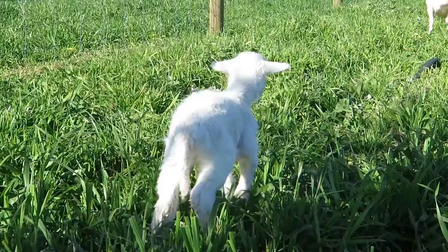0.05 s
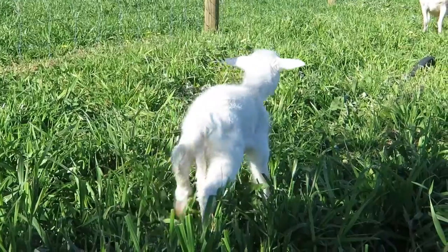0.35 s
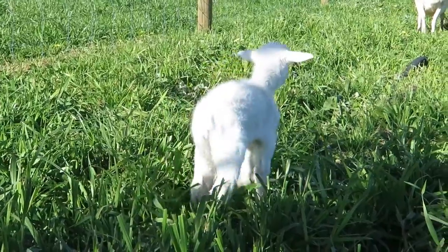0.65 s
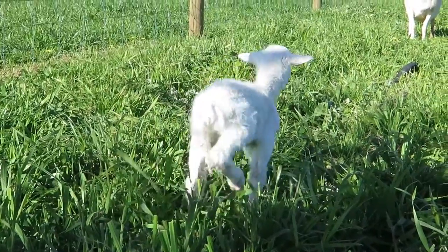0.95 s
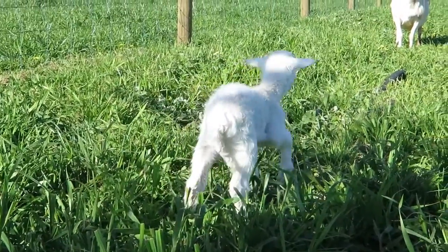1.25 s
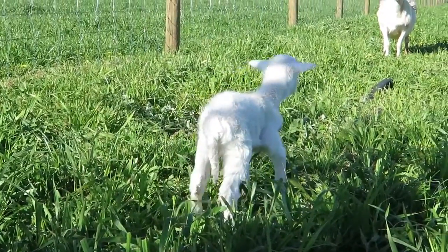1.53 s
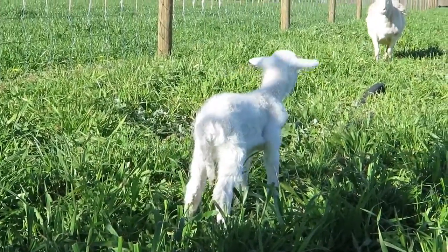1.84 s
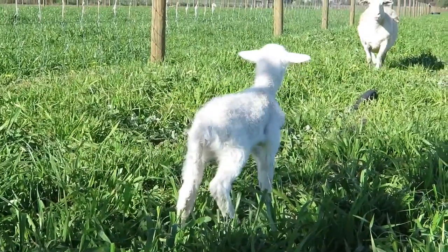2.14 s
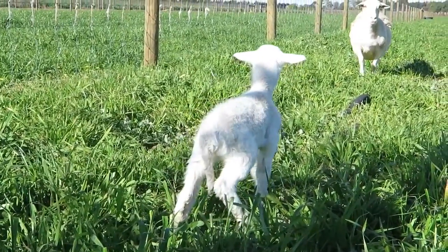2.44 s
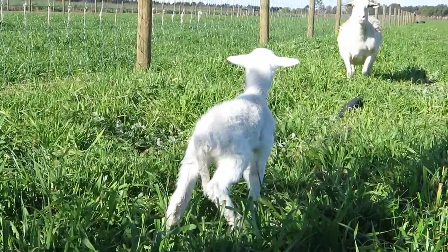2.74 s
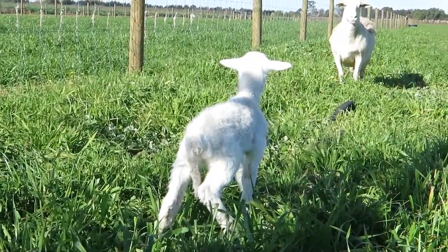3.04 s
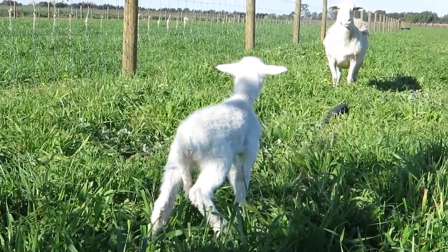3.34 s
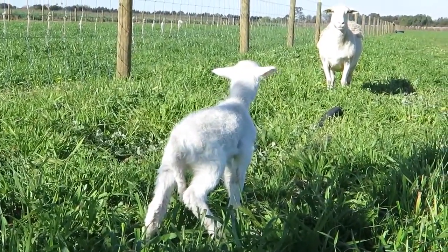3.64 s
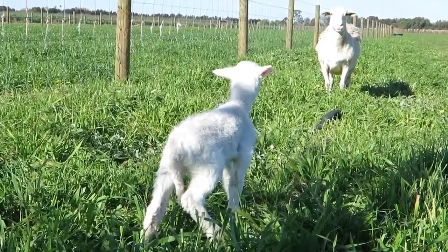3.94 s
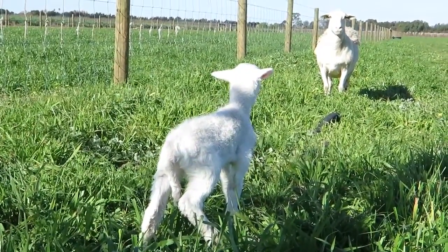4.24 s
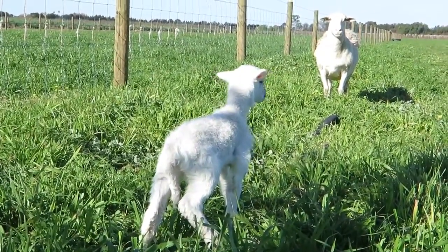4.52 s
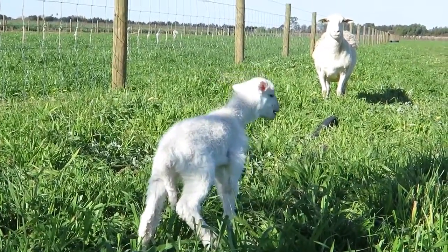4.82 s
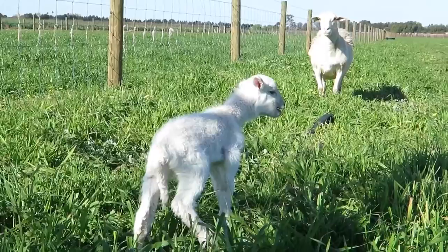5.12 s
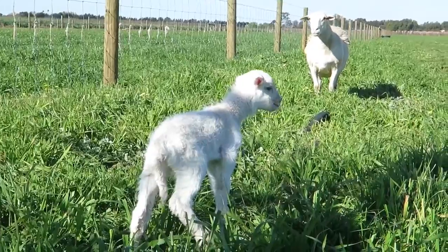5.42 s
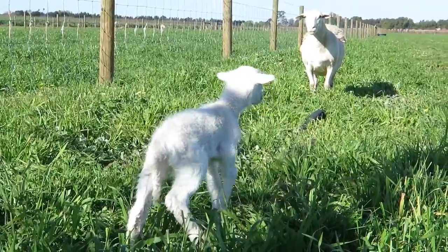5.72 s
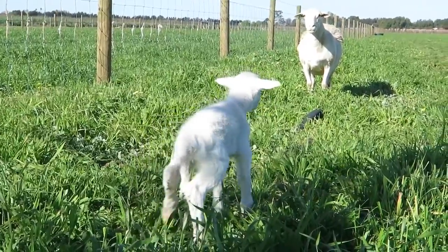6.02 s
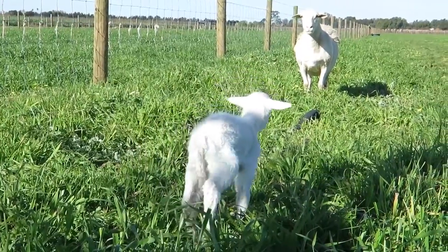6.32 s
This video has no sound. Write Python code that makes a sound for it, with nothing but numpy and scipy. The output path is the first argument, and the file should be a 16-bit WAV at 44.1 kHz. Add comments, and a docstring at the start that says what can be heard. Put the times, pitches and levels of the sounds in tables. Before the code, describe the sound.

Light wind buffets the microphone in an open paddock with no echo, and an engine hums faintly far away. A nearby lamb gives five high, steady bleats, the third and fourth loudest. One faint, low ewe call overlaps the second. Two bursts of quick, hard clicking from a loose part on the camera come after the second and fourth bleats. Grass swishes and snaps quietly now and then, and one hoof lands softly.

```python
"""Light wind rumbles over a distant engine hum, and a young lamb bleats five times a few steps away.
Each bleat is a stack of harmonics from the vocal folds, shaped by the throat and the opening mouth.
A ewe answers once from far off. In the gusts something loose on a hand-held camera rattles.
Now and then the paddock grass swishes or a stem snaps, and one hoof lands on soft turf."""
import sys
import numpy as np
from scipy import signal
from scipy.fft import rfft, irfft, next_fast_len
from scipy.io import wavfile

SR = 44100
rng = np.random.default_rng(int(sys.argv[2]) if len(sys.argv) > 2 else 0)


def store_wav(level_fs):
    """Save 16-bit WAV to argv[1]."""
    pcm = np.round(np.clip(np.atleast_2d(level_fs), -1, 1) * 32767)
    wavfile.write(sys.argv[1], SR, pcm.T.astype(np.int16))


N = 285327
TIME = np.arange(N) / SR


def amp(db):
    """Decibels to gain."""
    return 10 ** (np.asarray(db) / 20)


def unit(x):
    """Scales to rms 1."""
    return x / np.sqrt(np.mean(x ** 2) + 1e-20)


def gain_at(spectrum, hz):
    """Gain of a spectrum, interpolated in dB over log frequency."""
    freq_hz, db = np.transpose(spectrum)
    return amp(np.interp(np.log(hz + 1), np.log(freq_hz + 1), db))


def curves(rows, t):
    """Every column after the first, interpolated at times t."""
    time_s, *columns = np.transpose(rows)
    return [np.interp(t, time_s, column) for column in columns]


def add(mix, start_s, sound):
    """Mixes a sound in at start_s."""
    part = mix[..., max(round(start_s * SR), 0):][..., :sound.shape[-1]]
    part += sound[..., :part.shape[-1]]


def wander(size, rate_hz):
    """Smooth random motion, rms about 1."""
    length = 2 ** 15 if size <= 2 ** 15 else 2 ** 19
    rolloff = 1 + (np.fft.rfftfreq(length, 1 / SR) / rate_hz) ** 4
    return unit(irfft(rfft(rng.standard_normal(length)) / rolloff))[:size]


def noise(spectrum, size, correlation):
    """Coloured stereo noise, rms 1."""
    length = next_fast_len(2 * (size // 2 + 1), True)
    gains = gain_at(spectrum, np.fft.rfftfreq(length, 1 / SR))
    mid, side = irfft(rfft(rng.standard_normal((2, length))) * gains, length)[:, :size]
    return unit(mid * np.sqrt(1 + correlation) + np.array([side, -side]) * np.sqrt(1 - correlation))


# wind strength: time_s, level_db
BREEZE = [(.1, -34.5), (1.1, -37), (2.1, -36.5), (3.6, -39), (5.1, -38), (6.47, -35)]
GUSTS = [(.1, -37), (.5, -37), (1.1, -37.5), (2.1, -36), (2.7, -42), (3.6, -37.5), (5.1, -43), (5.5, -36.5),
         (6.1, -32.5), (6.47, -40)]
# wind spectra: freq_hz, gain_db
RUMBLE_SPECTRUM = [(15, -32), (25, -13), (35, -9), (55, 0.5), (65, 7), (72, 14.5), (82, 2), (110, 2.5),
                   (140, -1.5), (220, -24.5), (600, -70)]
BUFFET_SPECTRUM = [(25, -40), (70, -2.5), (130, -4), (180, 4), (240, 1.5), (320, -6), (450, -11.5),
                   (650, -31), (1100, -25), (1600, -21), (4000, -28.5), (12000, -71)]
WASH_SPECTRUM = [(40, -32), (300, 8), (450, -2), (640, 1), (1100, 4), (1600, -6.5), (2700, -8), (5000, -9),
                 (9000, -13.5), (12500, -15.5), (15800, -25)]

def wind(lump_db=0.9, wash_db=-44.5, shimmer_db=0.9, wash_follow=0.59):
    """Deep rumble and the wash of the field swell with the breeze; gusts buffet the microphone."""
    breeze_db, gust_db = curves(BREEZE, TIME)[0], curves(GUSTS, TIME)[0]
    rumble = amp(breeze_db) * noise(RUMBLE_SPECTRUM, N, correlation=1.0)
    buffet = amp(gust_db + lump_db * wander(N, 25)) * noise(BUFFET_SPECTRUM, N, correlation=0.72)
    swell_db = wash_follow * (breeze_db - breeze_db.mean()) + shimmer_db * wander(N, 9.9)
    wash = amp(wash_db + swell_db) * noise(WASH_SPECTRUM, N, correlation=0.23)
    return rumble + buffet * amp([[.7], [-.7]]) + wash


# engine partials: freq_hz, level_db
HUM_PARTIALS = [(75.4, -40.5), (150.7, -46.5)]
# swell on both partials: time_s, gain_db
HUM_SWELL = [(0, -17), (2.3, -0.5), (3.2, 0.5), (5, 2), (6.47, 4.5)]

def engine(waver=0.0057):
    """A far engine drones on two partials that waver together."""
    clock_s = np.cumsum(1 + waver * wander(N, 3.0)) / SR
    drone = sum(amp(db) * np.sqrt(2) * np.sin(2 * np.pi * hz * clock_s) for hz, db in HUM_PARTIALS)
    return drone * amp(curves(HUM_SWELL, TIME)[0])


# blade swishes: start_s, length_s, level_db
SWISHES = [(0.07, 0.16, -46.5), (0.772, 0.17, -44), (1.65, 0.11, -49.5), (1.995, .12, -54),
           (2.268, 0.17, -51.5), (2.414, 0.041, -47), (6.132, 0.038, -48)]
# stem snaps: start_s, level_db
TICKS = [(2.7045, -31), (5.421, -42), (5.656, -33)]
# their spectra: freq_hz, gain_db
SWISH_SPECTRUM = [(1500, -29), (3000, -16), (5000, 3), (8000, 2), (11000, 7), (13500, -1), (16000, -17)]
TICK_SPECTRUM = [(3000, -10), (7000, -8), (10000, -1), (13000, -4), (16000, -8)]

def grass(grain_db=3.0, tick_t60_s=0.02):
    """Blades swish with a grainy hiss; snapping stems give dry ticks."""
    out = np.zeros((2, N))
    for start_s, length_s, db in SWISHES:
        size = int(length_s * SR)
        blades = unit(noise(SWISH_SPECTRUM, size, correlation=0.82) * amp(grain_db * wander(size, 250)))
        add(out, start_s, amp(db) * blades * np.sqrt(np.hanning(size)))
    t = np.arange(2048) / SR
    for start_s, db in TICKS:
        add(out, start_s, noise(TICK_SPECTRUM, len(t), correlation=.4) * amp(db - 60 * t / tick_t60_s))
    return out


RELEASE_S = 0.037
# voice bands (nasal, mouth, upper, edge): shut_drop_db, lag_s, tiring_factor
BANDS = [(-1, 0.0043, 0.079), (23, 0.017, 0.76), (24, 0.0024, 1.11), (17.5, 0.0015, 1.23)]

def effort(call, t, attack_s=0.032, attack_db=28.5, release_db=18):
    """Level of each band in dB: the voice swells, the mouth opens, the lamb tires and lets go."""
    start_s, shut_s, held_s, opening_s, *full_db, tiring_db = call
    open_s, let_go_s = start_s + shut_s, start_s + held_s
    onset_db = attack_db * np.clip(1 - (t - start_s) / attack_s, 0, 1)
    break_off_db = release_db * (np.maximum(t - let_go_s, 0) / RELEASE_S) ** 3
    sag_db = tiring_db * np.clip((t - open_s) / (let_go_s - open_s), 0, 1) ** 2
    levels_db = []
    for db, (shut_drop_db, lag_s, tiring_factor) in zip(full_db, BANDS):
        shut = .5 * (1 - np.tanh(.5 * (t - open_s - lag_s) / opening_s))
        levels_db.append(db - onset_db - break_off_db - tiring_factor * sag_db - shut_drop_db * shut)
    return levels_db


# highest throat resonances, common to all bleats: freq_hz, gain_db
EDGE = [(7100, -24), (8000, -27), (9200, -25), (10400, -18), (11500, -29), (12800, -32), (14000, -42.5),
        (15500, -51)]

def rasp(throat, phase, level_db, slack, rasp_db=-21, catch_db=9, pulsing=0.63):
    """Turbulence at the folds, one puff a cycle, stronger where the voice catches."""
    spectrum = [(1000, -45), (2700, -62)] + list(throat)[6:] + [(hz, db + 9.5) for hz, db in EDGE]
    puffs = noise(spectrum, len(phase), correlation=0.94) * (1 + pulsing * np.cos(phase))
    return puffs * amp(level_db + rasp_db + catch_db * slack)


# borders between the voice bands: freq_hz
BAND_BORDERS_HZ = [1150, 2620, 7200]

def bleat(call, held_pitch, throat, scoop=.12, scoop_s=.085, release_drop=.13,
          jitter=0.00345, slack_jitter=0.018, flutter_db=2.5, drift_db=4.0):
    """Harmonics through the throat; slack folds vibrate low and unevenly as they start and stop."""
    start_s, _, held_s, *_ = call
    let_go_s = start_s + held_s
    t = np.arange(start_s, let_go_s + 2 * RELEASE_S, 1 / SR)
    size = len(t)
    flat = scoop * np.maximum(1 - (t - start_s) / scoop_s, 0) ** 2
    flat += release_drop * (np.maximum(t - let_go_s, 0) / RELEASE_S) ** 1.27
    slack = np.clip(flat / 0.059, 0, 1)
    pitch_hz = curves(held_pitch, t)[0] * (1 - flat)
    orders = np.arange(1, 33)
    harmonics_hz = orders * np.median(pitch_hz)
    pitch_hz *= 1 + jitter * wander(size, 44) + slack_jitter * slack * wander(size, 143)
    phase = 2 * np.pi * np.cumsum(pitch_hz) / SR
    gains = gain_at(list(throat) + EDGE, harmonics_hz)
    bands = np.searchsorted(BAND_BORDERS_HZ, harmonics_hz)
    levels_db = effort(call, t)
    out = rasp(throat, phase, levels_db[2], slack)
    for k, hz, gain, band in zip(orders, harmonics_hz, gains, bands):
        level = amp(levels_db[band]) * gain / np.linalg.norm(gains[bands == band])
        # paths over the grass shift as the head moves: short waves vary most and differ between ears
        height = min(hz / 10000, 1)
        level *= amp(flutter_db * np.sqrt(height) * wander(size, 30.6))
        level *= amp(drift_db * height * wander(size, 4.9))
        ear_rad = 0.44 * height * (1 + 0.89 * wander(size, 4.5))
        # uneven cycles blur each harmonic, most when high or slack
        blur = amp(-24 + 6 * np.log2(hz / 4000) + 12 * slack)
        sidebands = blur * (wander(size, 78) + 1j * wander(size, 74))
        level *= np.sqrt(2 / (1 + 2 * blur ** 2))
        tone = level * (1 + sidebands) * np.exp(1j * (k * phase + rng.uniform(0, 2 * np.pi)))
        pan_db = 0.8 if hz < 3500 else -0.8
        out[0] += amp(pan_db / 2) * (tone * np.exp(1j * ear_rad)).real
        out[1] += amp(-pan_db / 2) * (tone * np.exp(-1j * ear_rad)).real
    return out * signal.windows.tukey(size, .02)


# calls: start_s, shut_s, held_s, opening_s, nasal_db, mouth_db, upper_db, edge_db, tiring_db
BLEATS = [(0.129, 0.081, 0.61, 0.014, -36, -23.5, -25.5, -33, 8.5),
          (1.198, 0.065, .43, 0.0091, -38, -27, -29, -35.5, 2.5),
          (3.126, 0.067, 0.57, 0.024, -35, -18.5, -21.5, -33.5, 5.5),
          (4.72, .057, 0.5817, 0.014, -40, -19.5, -20, -32.5, 1.7),
          (6.189, 0.077, 0.33, 0.005, -38, -33, -29, -40.5, 5.5)]
# held pitch, one list per bleat: time_s, pitch_hz
HELD_PITCH = [
    [(.238, 470.5), (.3, 478.6), (.422, 469.3), (.53, 473.4), (.65, 474), (.735, 474)],
    [(1.281, 462.7), (1.33, 476), (1.42, 463.8), (1.5, 469), (1.57, 476.6), (1.63, 471.3)],
    [(3.2, 481), (3.245, 484.4), (3.33, 483), (3.449, 482.3), (3.57, 492), (3.7, 482.7)],
    [(4.8, 476), (4.95, 482.5), (5.03, 489.4), (5.131, 501.2), (5.172, 491), (5.22, 498), (5.3, 491)],
    [(6.286, 464), (6.34, 468.3), (6.41, 456.4), (6.47, 461)],
]
# throat response in each bleat: freq_hz, gain_db
THROAT_1 = [(470, -9), (950, -12.5), (1420, 5), (1890, -18.5), (2370, -11.5), (2840, -29.5), (3310, -14),
            (3790, -9), (4260, -13.5), (4730, -9.5), (5210, -14), (5680, -10), (6150, -15.5), (6630, -27)]
THROAT_2 = [(470, -11.5), (940, -15.5), (1410, 4.5), (1880, -14.5), (2350, -11.5), (2820, -18),
            (3300, -11.5), (3770, -4.5), (4240, -9.5), (4710, -4), (5180, -9), (5650, -2), (6120, -4.5),
            (6590, -22)]
THROAT_3 = [(490, -21.5), (970, -17.5), (1460, 6), (1940, -12), (2430, -13.5), (2910, -19.5), (3400, -6.5),
            (3880, -13.5), (4370, -20), (4850, -4.5), (5340, -15), (5820, -18.5), (6310, -21.5),
            (6790, -26)]
THROAT_4 = [(490, -21), (980, -26.5), (1470, 1.5), (1960, -15.5), (2450, -17), (2940, -17.5), (3430, -7),
            (3920, -10.5), (4410, -14), (4900, -1.5), (5390, -11.5), (5880, -10), (6370, -20.5),
            (6860, -21.5)]
THROAT_5 = [(460, -7), (930, -13.5), (1390, 2.5), (1850, -10.5), (2320, -9.5), (2780, -28), (3240, 1.5),
            (3710, -12), (4170, -16), (4630, -4), (5090, -4.5), (5560, -11.5), (6020, -17), (6480, -27)]

def lamb():
    """Five bleats, each with its own throat shape."""
    out = np.zeros((2, N))
    throats = [THROAT_1, THROAT_2, THROAT_3, THROAT_4, THROAT_5]
    for call, held_pitch, throat in zip(BLEATS, HELD_PITCH, throats):
        add(out, call[0], bleat(call, held_pitch, throat))
    return out


# ewe's call: time_s, pitch_hz, level_db
EWE_CALL = [(1.0, 148.5, -63), (1.059, 151.8, -53), (1.2, 159.5, -48.5), (1.32, 158.6, -43.5),
            (1.42, 158, -42.5), (1.52, 153, -50), (1.621, 149, -50)]
# her throat resonances: centre_hz, width_hz, gain_db
EWE_THROAT = [(782, 44, 2.5), (1610, 410, 2)]

def ewe(jitter=0.0053):
    """A low, distant call of which only two throat resonances carry."""
    start_s, end_s = EWE_CALL[0][0], EWE_CALL[-1][0]
    t = np.arange(start_s, end_s, 1 / SR)
    pitch_hz, level_db = curves(EWE_CALL, t)
    phase = 2 * np.pi * np.cumsum(pitch_hz * (1 + jitter * wander(len(t), 40))) / SR
    voice = np.zeros(len(t))
    for k in range(2, 16):
        for centre_hz, width_hz, db in EWE_THROAT:
            detuning = 2 * (k * pitch_hz - centre_hz) / width_hz
            voice += amp(db) / (1 + detuning ** 2) * np.cos(k * phase + k * k)
    out = np.zeros((2, N))
    add(out, start_s, amp(level_db) * unit(voice))
    return out


# casing modes, main ring second: freq_hz, gain_db, t60_s
CASING_MODES = [(1150, -4.5, 0.022), (2200, 3.5, 0.026), (1290, -9.5, 0.01), (2890, -12, 0.017),
                (5966, -14, 0.023)]
# contact snap: freq_hz, gain_db
SNAP_SPECTRUM = [(300, -20), (650, -13), (1100, -14), (2200, 7), (3800, -27), (5000, 2), (6000, -3),
                 (7000, -8), (9500, -21), (11500, -8), (13000, -16), (16000, -32)]

def knock(level_db, pitch_hz, ring_db=-4, snap_db=-12, snap_t60_s=0.013, contact_s=0.0002):
    """A blow on the casing: a snap, and a short ring whose main pitch depends on the contact point."""
    t = np.arange(2048) / SR
    mode_hz, mode_db, t60_s = np.transpose(CASING_MODES)[:, :, None]
    detuned_hz = mode_hz * (1 + 0.016 * rng.standard_normal(mode_hz.shape))
    mode_hz = np.where(mode_db == mode_db.max(), pitch_hz, detuned_hz)
    phases = 2 * np.pi * (mode_hz * t + rng.random(mode_hz.shape))
    ring = (amp(mode_db - 60 * t / t60_s) * np.sin(phases)).sum(0)
    snap = noise(SNAP_SPECTRUM, len(t), correlation=0.53)
    snap *= amp(snap_db + 3 * rng.standard_normal() - 60 * t / snap_t60_s)
    return amp(level_db) * (amp(ring_db) * ring + snap) * (1 - np.exp(-t / contact_s))


# hard knocks: start_s, level_db, pitch_hz
KNOCKS = [(1.742, -37, 2200), (1.82, -19.5, 2200), (1.865, -24, 2250), (1.879, -20, 2100),
          (1.895, -23, 2200), (1.926, -20.5, 2320), (1.941, -21, 2270), (1.982, -14.5, 2230),
          (1.997, -20.5, 2110), (2.06, -23, 2210), (2.083, -30, 2210), (2.121, -22.5, 2160),
          (2.254, -20, 2020), (2.38, -26.5, 2270), (5.464, -28, 2200), (5.493, -19.5, 2120),
          (5.541, -24.5, 2200), (5.561, -23, 1900), (5.585, -22, 2200), (5.691, -15, 2130),
          (5.719, -21.5, 2120), (5.734, -20, 2200), (5.755, -19.5, 2050), (5.769, -17.5, 2160),
          (5.799, -20, 2130), (5.813, -20, 2200), (5.828, -13.5, 2090), (5.85, -22, 2100),
          (5.879, -20, 1970), (5.892, -16, 2100), (5.952, -16, 1960), (5.972, -13.5, 2155),
          (5.99, -21.5, 2200), (6.015, -19.5, 1990), (6.032, -18, 1970), (6.039, -19, 1970),
          (6.09, -18, 1760), (6.121, -22, 2180), (6.152, -19, 1850), (6.173, -22, 2160), (6.225, -19, 2050)]
# spells of light chatter: start_s, end_s, level_db
CHATTER = [(1.709, 1.81, -34), (1.941, 2.14, -30), (2.141, 2.4, -38.5), (5.352, 5.68, -29),
           (5.68, 6.23, -28.5)]

def rattle(rate_hz=90, spread_db=6, pitch_scatter=0.077):
    """A loose part knocks on the camera casing, with irregular light chatter in between."""
    out = np.zeros((2, N))
    for start_s, db, pitch_hz in KNOCKS:
        add(out, start_s, knock(db, pitch_hz))
    for start_s, end_s, db in CHATTER:
        for slot_s in np.arange(start_s, end_s, 1 / rate_hz):
            late, force, place = rng.uniform(-1.1, 1, 3)
            pitch_hz = CASING_MODES[1][0] * (1 + pitch_scatter * place)
            add(out, slot_s + .5 * late / rate_hz, knock(db + spread_db * force, pitch_hz))
    return out


# hoof fall: start_s, level_db
HOOF_FALL = (2.787, -36)
# turf thud: freq_hz, gain_db
THUD_SPECTRUM = [(200, -21), (450, -10), (750, 4), (1100, -11), (1700, 0), (3000, -23), (8000, -35)]

def hoof(t60_s=0.064):
    """A hoof lands on soft turf: a dull puff."""
    start_s, db = HOOF_FALL
    t = np.arange(4096) / SR
    out = np.zeros((2, N))
    add(out, start_s, noise(THUD_SPECTRUM, len(t), correlation=0.74) * amp(db - 60 * t / t60_s))
    return out


def scene():
    """The open paddock: no walls, so no echo."""
    return wind() + engine() + grass() + lamb() + ewe() + rattle() + hoof()


def record(dry):
    """The microphone opens after a moment; a steep low-pass cuts the top treble."""
    open_s, cutoff_hz = .083, 15900
    gate = np.interp(TIME, [open_s, open_s + .004], [amp(-46), 1])
    lowpass = signal.firwin(511, cutoff_hz, window=("kaiser", 9), fs=SR)
    return signal.oaconvolve(dry * gate, lowpass[None], "same")


dry = scene()
out = record(dry)
store_wav(out)
```